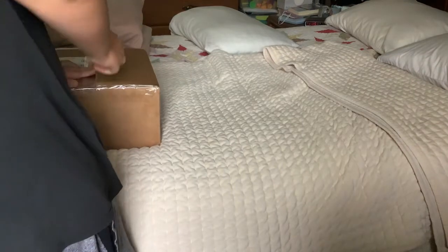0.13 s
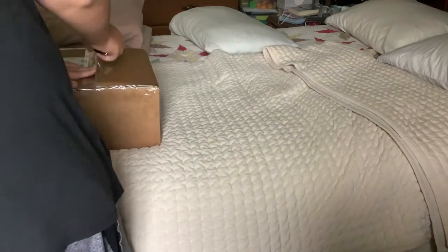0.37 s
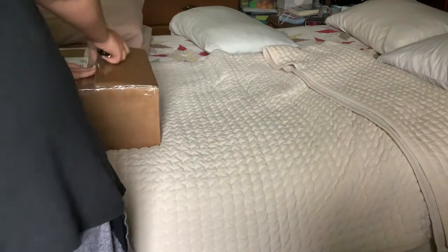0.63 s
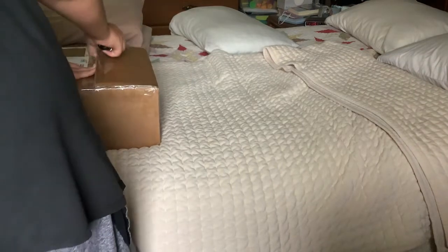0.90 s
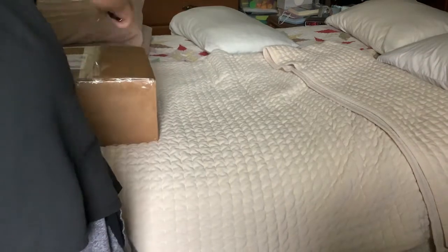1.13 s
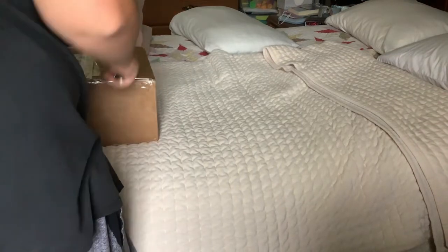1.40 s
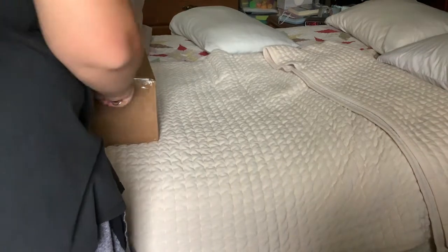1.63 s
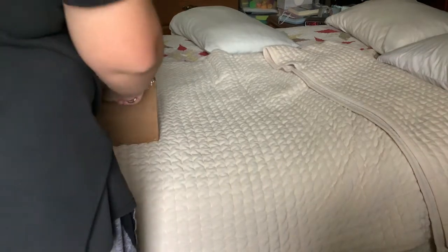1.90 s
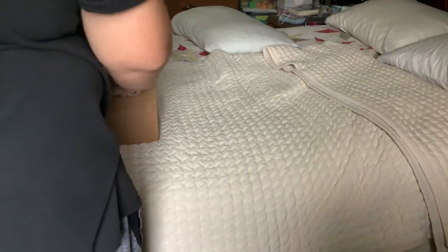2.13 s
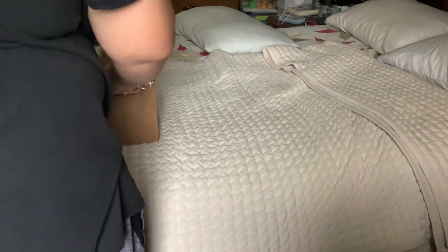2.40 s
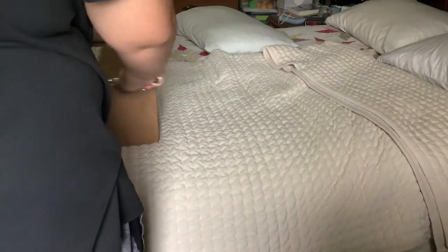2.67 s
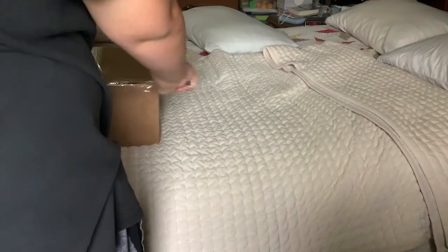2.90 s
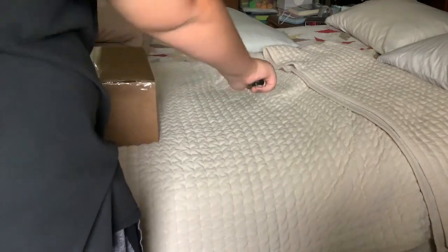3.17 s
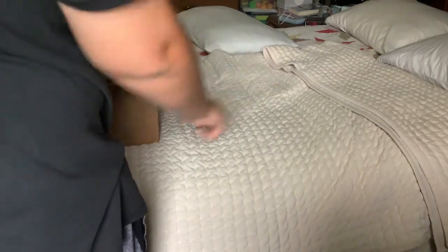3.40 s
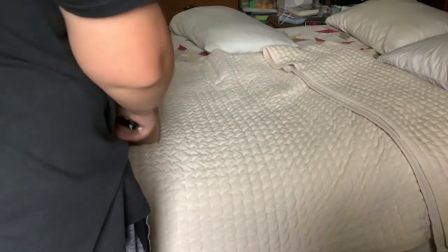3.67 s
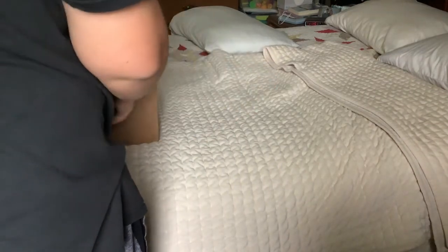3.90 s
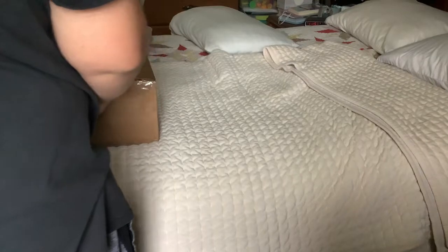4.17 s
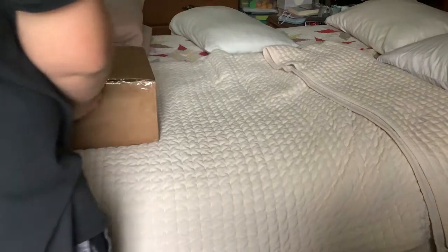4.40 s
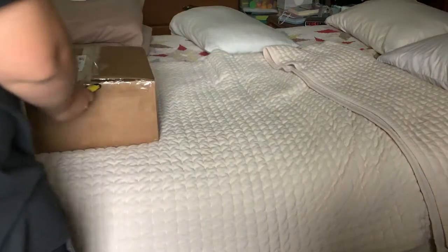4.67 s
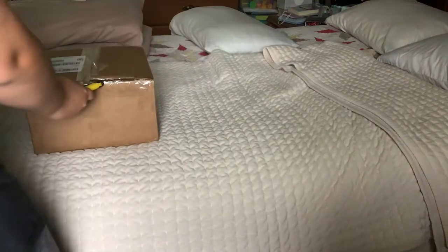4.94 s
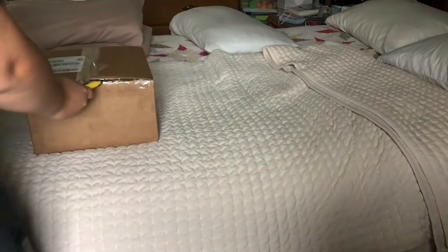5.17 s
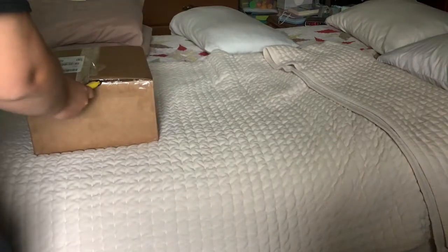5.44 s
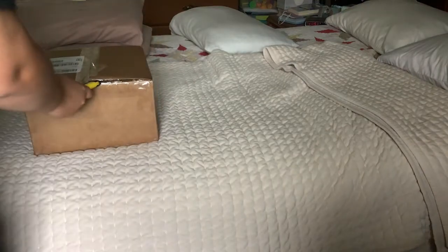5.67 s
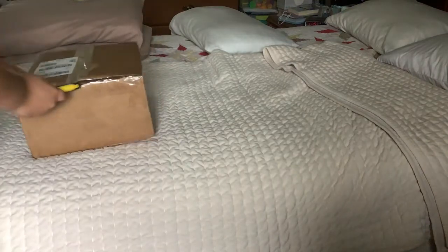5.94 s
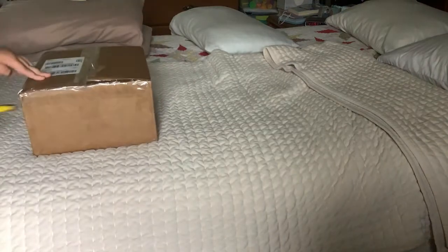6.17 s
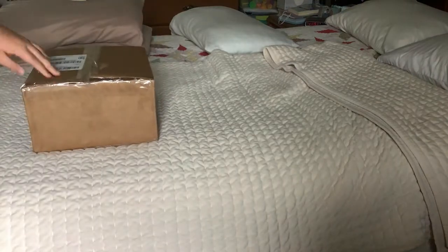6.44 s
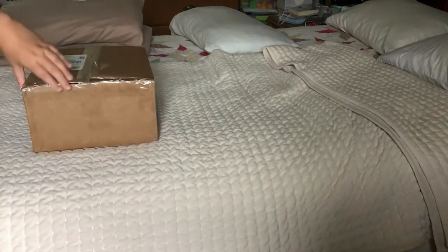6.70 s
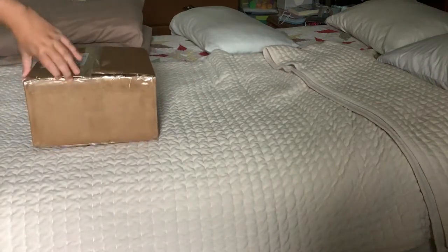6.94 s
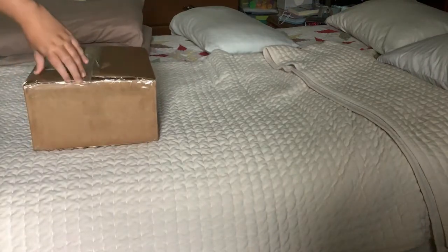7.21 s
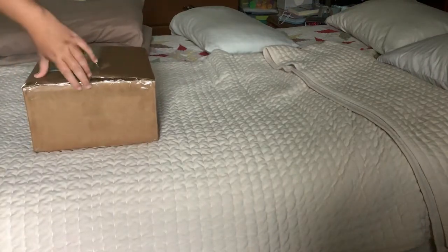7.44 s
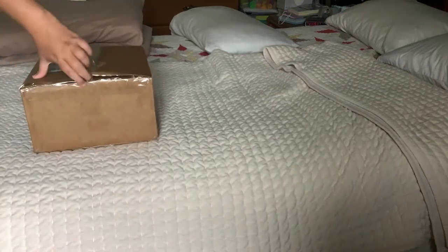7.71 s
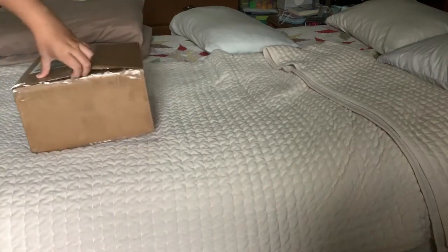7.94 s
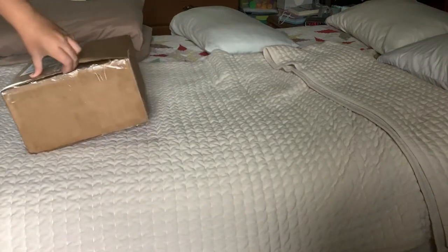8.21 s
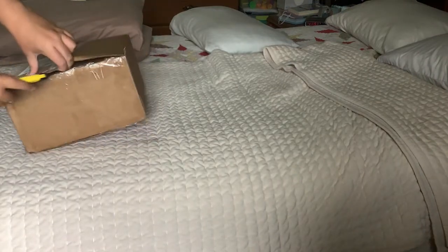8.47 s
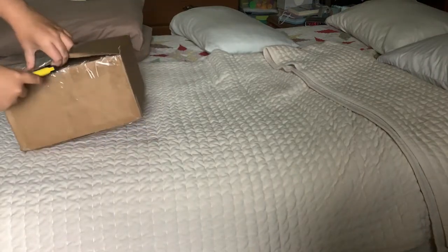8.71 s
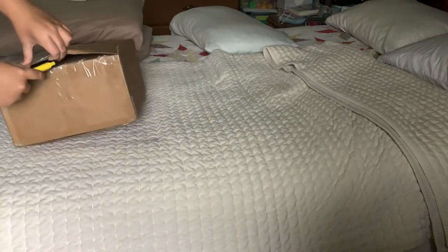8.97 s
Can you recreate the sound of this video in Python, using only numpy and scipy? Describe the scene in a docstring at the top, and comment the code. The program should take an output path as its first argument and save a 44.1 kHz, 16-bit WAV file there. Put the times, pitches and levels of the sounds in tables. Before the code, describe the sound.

Close, dry sound of a taped cardboard box being opened on a bed. Fingers rub faintly, a short tape snap comes near one second, then a dense crackling rip with hollow bumps. After sparse knocks and scrapes, the loudest sharp snap and a low squeak hit around six seconds, followed by lighter crackles and tugs. A soft low room rumble runs underneath.

```python
"""Packing tape lets go of a cardboard box in sharp snaps, hiss and dense crackle: clicks and noise in taut film.
Stretched tape and card squeak in gliding narrow bands; fingers rub the card, heard as noise through resonances.
The hollow box is knocked and shaken by hands: soft pushes and noise excite its damped modes.
It stands on a bed in a small soft room with a very short reverberation, over a low, nearly steady rumble."""
import sys
import numpy as np
from scipy import signal
from scipy.fft import rfft, irfft
from scipy.io import wavfile
from scipy.ndimage import uniform_filter1d

SR = 44100
rng = np.random.default_rng(int(sys.argv[2]) if len(sys.argv) > 2 else 0)


def persist_wave(psi):
    """Save psi, clipped to +-1, as 16-bit WAV."""
    counts = np.round(np.clip(psi, -1, 1) * 32767).astype(np.int16)
    wavfile.write(sys.argv[1], SR, np.atleast_2d(counts).T)


def gain_from_db(level_db):
    """Turn a decibel level (scalar or array-like) into a linear amplitude factor."""
    decades = np.asarray(level_db, float) / 20
    return 10 ** decades


N = 400869   # length in samples


def rms_one(x):
    """Normalisation: scale a signal to rms 1."""
    return x / np.sqrt(np.mean(x ** 2) + 1e-20)


def coloured(x, points):
    """Spectral shaping: filter by a (frequency_hz, density_db) table, then normalise to rms 1."""
    hz, db = np.transpose(points)
    bins = np.maximum(np.fft.rfftfreq(len(x), 1 / SR), 1)
    gain = gain_from_db(np.interp(np.log(bins), np.log(hz), db))
    return rms_one(irfft(rfft(x) * gain, len(x)))


def drift(rate_hz):
    """Slow random modulation: noise through a double low-pass pole, with a spread of about 1."""
    r = np.exp(-2 * np.pi * rate_hz / SR)
    noise = rng.standard_normal(N + SR)
    return rms_one(signal.lfilter([1], [1, -2 * r, r * r], noise)[SR:])


def resonance(x, hz, width_hz):
    """Simple resonator: a two-pole band with gain 1 on top."""
    r = np.exp(-np.pi * width_hz / SR)
    poles = [1, -2 * r * np.cos(2 * np.pi * hz / SR), r * r]
    return signal.lfilter([(1 - r * r) / 2, 0, (r * r - 1) / 2], poles, x)


FILM_RING_HZ, FILM_EDGE_HZ = 9200, 8400   # usual ring of the film; it holds little below the edge


def thin_film(clicks, hz=FILM_RING_HZ, width_hz=7000):
    """Impulse response of taut film: a few cycles at a very high pitch."""
    edge = signal.butter(5, FILM_EDGE_HZ, "high", fs=SR, output="sos")
    return signal.sosfilt(edge, resonance(clicks, hz, width_hz))


# single loud snaps of tape; ring_db is relative to the strength
# columns: start_s, strength_db, ring_hz, ring_db
TAPE_SNAPS = [(0.122, -46, 4450, -11.5), (0.1906, -61, 3540, 0.5), (0.6297, -35.5, 2130, -23),
              (0.792, -50, 9000, -21), (0.8335, -44, 8500, -24), (0.88, -36, 1690, -30),
              (0.955, -37, 6950, -28), (0.9694, -14, 7800, -27.5), (1.0549, -28.5, 2600, -35),
              (1.217, -46.5, 3800, -21.5), (1.3878, -35.5, 5830, -26), (2.218, -51.5, 1590, -18),
              (2.368, -30.5, 3900, -17.5), (2.521, -39.5, 8500, -33), (2.5358, -23.5, 3010, -26),
              (2.6145, -20, 3000, -39), (2.6581, -16, 2650, -35.5), (2.709, -24, 3600, -45),
              (2.72, -25, 3570, -45), (2.742, -19, 3600, -36), (2.7533, -20.5, 3570, -35),
              (2.821, -27.5, 3800, -28), (2.8439, -28, 3570, -40), (2.8526, -20, 3600, -33),
              (2.869, -20, 3600, -40), (2.8767, -15.5, 3370, -40), (2.8938, -9.5, 3500, -57),
              (2.925, -13.5, 3760, -29), (3.044, -35, 3560, -37), (3.237, -53, 3760, -15.5),
              (3.3826, -17.5, 2860, -35), (3.7405, -32.5, 2960, -28), (4.125, -57.5, 4400, -2.5),
              (4.3274, -43.5, 6600, -31), (4.8491, -34, 14200, -30), (5.1613, -20, 8060, -26.5),
              (5.4734, -41.5, 1680, -47), (5.7439, -27.5, 2110, -30), (5.8797, -30.5, 5140, -31),
              (5.9588, -35, 6750, -36), (5.967, -21, 6000, -38.5), (5.9784, -11, 3550, -28),
              (6.055, 1, 6070, -34.5), (6.084, -42, 6800, -17), (6.5314, -40.5, 1515, -10),
              (6.7182, -40, 3030, -34.5), (6.9306, -27, 2840, -29.5), (7.0843, -45, 7000, -24),
              (7.13, -35, 2770, -36), (7.1558, -35.5, 4120, -29), (7.1939, -25.5, 3000, -28),
              (7.224, -36, 9500, -39), (7.2353, -37, 2730, -38), (7.3474, -22.5, 6240, -31.5),
              (7.4182, -35.5, 9000, -33), (7.492, -33, 7100, -32), (7.528, -22, 13500, -26.5),
              (7.6887, -44, 9000, -25), (7.816, -23, 4300, -36.5), (7.923, -40, 8500, -34),
              (7.9448, -27, 1980, -44), (8.182, -40, 1560, -29), (8.3153, -29, 3090, -27),
              (8.338, -30, 3960, -31), (8.41, -23.5, 4200, -35.5), (8.57, -30.5, 4170, -31),
              (8.591, -22.5, 2830, -27.5), (8.601, -13.5, 2330, -38), (8.6868, -34, 6040, -36),
              (8.7037, -27.5, 6500, -43), (9.0099, -47.5, 1480, -9), (9.011, -50, 3780, -13)]
SNAP_S = .00035   # decay time of the splinter of noise in which the bond breaks
TICK_DB, TICK_HZ = -15, 3500   # part of a snap that goes straight into the card as a duller tick
RING_WIDTH = .2   # bandwidth of a ring as a share of its pitch
RUSTLE_DB = -29.5   # after-rustle, relative to the strength of the snap


def snaps():
    """Impulsive release: a click of the film, a short ring of card or, at the highest pitches, of taut film,
    and a grainy rustle as the tape springs back."""
    out, t = np.zeros(N + SR), np.arange(SR // 4) / SR
    noise = rng.standard_normal((len(TAPE_SNAPS), 3, len(t)))
    for (start, strength_db, hz, ring_db), (hiss, shake, lumps) in zip(TAPE_SNAPS, noise):
        splinter = lumps * np.exp(-t / SNAP_S) + 2 * (t == 0)
        tick = resonance(splinter, TICK_HZ, 5400)
        click = thin_film(splinter, width_hz=7100) + gain_from_db(TICK_DB) * tick
        click = 1.48 * click / np.linalg.norm(click)

        band = resonance(resonance(shake, hz, RING_WIDTH * hz), hz, 2 * RING_WIDTH * hz)
        # reversed, so that the band is already built up at the start
        ring = rms_one(band)[::-1] * np.exp(-t / 0.031)
        # the ring starts with a clean ping
        ring = ring + 1.1 * np.sin(2 * np.pi * hz * t) * np.exp(-t / 0.0064)

        # the rustle comes in millisecond lumps
        grain = gain_from_db(2.0 * rms_one(uniform_filter1d(lumps, size=60)))
        rustle = rms_one(resonance(hiss, 7600, 13000) * grain)
        rustle = rustle * np.exp(-t / 0.024) * (1 - np.exp(-t / 0.001))

        at = round(start * SR)
        out[at:at + len(t)] += gain_from_db(strength_db) * (click + gain_from_db(ring_db) * ring + gain_from_db(RUSTLE_DB) * rustle)
    return out[:N]


def grains(per_s, spread_db):
    """Random point process: clicks of very uneven size whose rate swells into clumps."""
    sizes = gain_from_db(spread_db * np.minimum(rng.exponential(1, N), 3.5)) * rng.choice([-1, 1], N)
    return sizes * (rng.random(N) < per_s * gain_from_db(5 * drift(25)) / SR)


# noise spectrum of peeling tape
# columns: frequency_hz, density_db (relative, per Hz)
FILM_SPECTRUM = [(2350, -49.5), (4000, -4), (6020, 1.5), (9230, 3), (14700, -2.5), (15800, 1.5),
                 (16500, -49)]
# small crackles ring higher or lower with the span of free film
# column: pitch_hz
CRACKLE_PITCHES = [8500, 10600, 13500]
CRACKLES_PER_S, CRACKLE_SPREAD_DB = 380, 4   # rate at full effort, before clumping; scale of uneven sizes
HARD_PEEL_DB = -49.5   # tape level of full effort
PATCHY_DB = 2.2   # parts of the film's hiss swell apart from each other


def peeling(level_db):
    """Stick-slip fracture: the adhesive front hisses in lumps and breaks into more crackle on a harder pull."""
    effort = np.clip(gain_from_db(level_db - HARD_PEEL_DB), 0, 1) ** 2
    clicks = grains(CRACKLES_PER_S * effort, CRACKLE_SPREAD_DB)
    dealt = rng.integers(0, len(CRACKLE_PITCHES), N)   # each click falls to one pitch
    crackle = rms_one(sum(thin_film(clicks * (dealt == k), hz, width_hz=1100)
                          for k, hz in enumerate(CRACKLE_PITCHES)))
    hiss = coloured(rng.standard_normal(N) * gain_from_db(2.5 * drift(120)), FILM_SPECTRUM)
    patches = sum(gain_from_db(PATCHY_DB * drift(9)) * resonance(hiss, hz, .4 * hz)
                  for hz in [4500, 8300, 13500])
    return gain_from_db(level_db) * (0.23 * crackle + rms_one(.5 * hiss + patches))


# thin squeaks and narrow scrapes of stretched tape and card; level_db holds before flicker and edge fades
# columns: start_s, end_s, start_hz, end_hz, width_hz, level_db
SQUEAK_GLIDES = [(1.283, 1.318, 3020, 3050, 50, -67.5), (1.31, 1.49, 2320, 2360, 50, -69),
                 (1.582, 1.658, 950, 1080, 97, -67), (1.635, 1.7, 4200, 3950, 188.6, -75),
                 (2.9, 2.948, 3600, 4000, 390, -52), (3.908, 3.999, 1390, 1920, 190, -72.5),
                 (3.996, 4.045, 1680, 1320, 150, -70), (1.5, 1.525, 2030, 2160, 65, -71),
                 (8.2, 8.31, 3700, 3700, 370.4, -75.5), (5.239, 5.32, 5130, 5170, 300, -69.5),
                 (5.76, 5.85, 7040, 7100, 64.81, -68), (5.874, 5.993, 650, 655, 30, -53.5),
                 (6.027, 6.132, 655, 596, 70, -48), (6.153, 6.496, 3000, 3900, 119, -72)]
SQUEAK_TONE = 0.9   # upper limit of the share of steady tone, approached in the narrowest squeaks
SQUEAK_FLICKER_DB = 1.8


def squeaks():
    """Narrow-band modulation: bands of noise glide, waver and flicker; the narrowest hold a tone."""
    out = np.zeros(N)
    noise = rng.standard_normal((len(SQUEAK_GLIDES), 4, SR // 2))
    for (start, end, start_hz, end_hz, width, db), draws in zip(SQUEAK_GLIDES, noise):
        a, b = round(start * SR), round(end * SR)
        waver, flicker = [rms_one(uniform_filter1d(d, size=900))[:b - a] for d in draws[:2]]
        r = np.exp(-2 * np.pi * width / SR)
        # complex low-pass noise, moved up to the gliding pitch below
        band = signal.lfilter([1], [1, -2 * r, r * r], draws[2] + 1j * draws[3])[a - b:]
        share = np.clip(SQUEAK_TONE * (1 - width / 250), 0, 1)
        pitch_hz = np.linspace(start_hz, end_hz, b - a) + 0.55 * width * waver
        carrier = np.exp(2j * np.pi * np.cumsum(pitch_hz) / SR)
        envelope = share + np.sqrt(1 - share ** 2) * band / np.std(band)
        sound = rms_one((envelope * carrier).real)
        out[a:b] += gain_from_db(db + SQUEAK_FLICKER_DB * flicker) * sound * np.hanning(b - a) ** 0.24
    return out


# broad resonances of the rubbed card; level_db also drifts
# columns: pitch_hz, width_hz, level_db (relative)
CARD_BANDS = [(1050, 1060, 24), (1970, 590, -12), (2450, 530, 12.5), (3000, 3940, 22), (4200, 3600, -15),
              (5650, 960, 0)]
# narrow patches of the card that come and go under the skin
FIBRES_DB, FIBRES_FLICKER_DB, FIBRES_WIDTH_HZ = -8, 7.5, 320


def rubbing(level_db):
    """Friction noise: skin drags over card, whose broad and flickering narrow resonances colour the hiss."""
    drag = rng.standard_normal(N) * gain_from_db(2.0 * drift(90))   # the skin catches in short lumps
    broad, fibres = 0, 0
    for k, (hz, width, db) in enumerate(CARD_BANDS):
        broad = broad + gain_from_db(db + 1.5 * drift(6)) * resonance(drag, hz, width) * (-1) ** k
    for hz in np.geomspace(1400, 6000, 9):
        flicker = gain_from_db(FIBRES_FLICKER_DB * np.clip(drift(6.5), -3, 1.6))
        fibres = fibres + flicker * resonance(drag, hz, FIBRES_WIDTH_HZ)
    return gain_from_db(level_db) * rms_one(rms_one(broad) + gain_from_db(FIBRES_DB) * rms_one(fibres))


def in_time(rows):
    """Linear interpolation in dB: the columns of a table at every sample; silence outside it."""
    s, *columns = np.transpose(rows)
    t = np.arange(N) / SR
    return np.array([np.interp(t, s, c, left=-200, right=-200) for c in columns])


FADE_DB = 20   # what a level loses over its rise or fall time


def loudest(level_db, events):
    """Exponential envelopes: events rise and fade evenly in dB; the loudest at any moment counts."""
    out = level_db.copy()
    for peak, rise, fall, *db in events:
        a, b = max(int((peak - 3 * rise) * SR), 0), min(int((peak + 3 * fall) * SR), N)
        t = np.arange(a, b) / SR - peak
        loss_db = FADE_DB * np.maximum(-t / rise, t / fall)
        out[:, a:b] = np.maximum(out[:, a:b], np.c_[db] - loss_db)
    return out


# long pulls, one table each
# columns: time_s, tape_db, skin_db
LONG_PULLS = [
    [(2.49, -114, -90), (2.54, -40.5, -48.5), (2.58, -40.5, -45.5), (2.62, -52.5, -60), (2.7, -45.5, -52),
     (2.81, -55, -56.5), (2.88, -55, -59), (2.94, -40, -43.5), (3.01, -64, -57.5), (3.06, -61, -72),
     (3.13, -108, -83)],
    [(5.84, -72, -71.5), (5.98, -39, -46), (6.04, -49, -41), (6.07, -56, -46), (6.14, -58, -53),
     (6.2, -83, -57), (6.335, -75, -59), (6.36, -55, -58), (6.39, -58.5, -58.5), (6.445, -75.5, -58.5),
     (6.53, -91, -64.5)],
    [(7.46, -89, -76), (7.5, -53, -68), (7.54, -60, -57), (7.65, -80, -73), (7.72, -61.5, -59),
     (7.83, -54.5, -62), (7.9, -67.5, -61), (7.96, -62, -69), (8.01, -59.5, -60.5), (8.16, -96, -83)],
]
# strokes of the fingers that swell and fade
# columns: peak_s, rise_s, fall_s, tape_db, skin_db
FINGER_STROKES = [(0.0, .05, 0.064, -63.5, -58.5), (0.22, 0.18, 0.13, -71, -65.5),
                  (0.55, 0.044, 0.07, -68, -70), (0.81, 0.53, 1, -74.5, -68.5),
                  (0.978, 0.049, 0.12, -45, -45), (1.28, 0.2, 0.69, -72, -69.5),
                  (1.4, 0.24, 0.22, -69.5, -63), (1.665, 0.14, 0.14, -70.5, -61.5),
                  (1.81, 0.32, 0.12, -88, -71), (2.26, 0.17, 0.041, -72.5, -73),
                  (3.25, 0.022, 0.11, -76, -68), (3.36, 0.027, 0.13, -60.5, -73),
                  (3.72, 0.068, 0.096, -67.5, -68), (3.96, 0.13, 0.085, -61, -72),
                  (4.03, 0.26, 0.22, -76, -66.5), (4.18, 0.046, 0.047, -68.5, -63.5),
                  (4.899, 0.12, 0.084, -88.5, -60.5), (5.09, 0.15, 0.078, -92, -62),
                  (5.3, 0.1, 0.13, -73, -70), (5.5, 0.21, 0.31, -75, -68), (6.729, 0.32, 0.38, -73.5, -75),
                  (6.941, 0.068, 0.077, -56.5, -59.5), (7.21, 0.43, 0.65, -71.5, -75.5),
                  (8.601, 0.015, 0.075, -42.5, -42.5), (8.74, 0.42, 0.04, -62, -73)]
# sudden tugs with a quick attack, then dying; the peak comes TUG_ATTACK_S after the start
# columns: start_s, fall_s, tape_db, skin_db
SUDDEN_TUGS = [(0.116, 0.091, -72, -63), (0.631, 0.11, -53, -54.5), (2.362, 0.074, -53, -54.5),
               (3.379, 0.062, -46, -43), (3.731, 0.062, -47.5, -52.5), (4.842, 0.06, -66, -64),
               (5.153, 0.09, -51, -57), (5.739, 0.091, -50.5, -48), (6.519, 0.1, -58.5, -53.5),
               (7.338, 0.12, -57.5, -60), (8.172, 0.14, -66, -62), (8.308, 0.078, -52, -66.5),
               (8.404, 0.15, -58, -55.5), (8.564, 0.13, -55, -59), (9.003, 0.057, -78, -61)]
TUG_ATTACK_S = 0.014
REST_TAPE_DB, REST_SKIN_DB = -83.5, -84.5   # hands lying on the box


def hands():
    """Envelope control: levels of tape and skin from rest, pulls, strokes and tugs."""
    pulled = np.max([in_time(pull) for pull in LONG_PULLS], axis=0)
    held = np.maximum(pulled, [[REST_TAPE_DB], [REST_SKIN_DB]])
    tugs = [(start + TUG_ATTACK_S, TUG_ATTACK_S, *rest) for start, *rest in SUDDEN_TUGS]
    return loudest(held, FINGER_STROKES + tugs)


# wall and cavity modes of the box; level_db is relative, before the favoured pitch weighs it
# columns: pitch_hz, level_db, t60_s
BOX_MODES = [(100.5, 2, 0.062), (118, 6, 0.056), (176.5, -10, 0.22), (210, -13, 0.2), (276, -1, 0.048),
             (343, -2, 0.051), (376.4, -6.5, 0.089), (424.7, -11, 0.16), (497, -9.5, 0.11),
             (583, -3.5, 0.03), (655, -3, 0.047), (800, 1.5, 0.0097)]


def box(force, near_hz=300, reach=6.1):
    """Modal synthesis: damped modes ring, most within a reach (octaves) of the favoured pitch."""
    out = 0
    for k, (hz, db, t60) in enumerate(BOX_MODES):
        r, w = gain_from_db(-60 / (t60 * SR)), 2 * np.pi * hz / SR
        gain = gain_from_db(db - 2.3 * (np.log2(hz / near_hz) / reach) ** 2)
        signed_gain = gain * np.sin(w) * (-1) ** k
        out = out + signal.lfilter([0, signed_gain], [1, -2 * r * np.cos(w), r * r], force + 1e-18)
    return out


# knocks on the box; the peak lies 3.5 dB below level_db, and the blow favours modes near pitch_hz
# columns: start_s, level_db, pitch_hz
BOX_KNOCKS = [(0.967, -32, 244), (0.978, -35, 680), (1.29, -51, 580), (1.595, -44.5, 230),
              (1.678, -39, 433), (2.554, -30.5, 332), (2.903, -31, 196), (2.948, -28.5, 118),
              (3.381, -33, 600), (3.389, -19.5, 325), (3.402, -24.5, 333), (3.421, -40, 296),
              (3.438, -34.5, 280), (3.74, -44.5, 357), (4.742, -51, 690), (4.741, -41.5, 430),
              (5.966, -35.5, 646), (5.995, -32, 125), (6.049, -27.5, 335), (7.528, -42, 328),
              (7.545, -47.5, 567), (7.745, -43, 418), (7.816, -39.5, 320), (8.606, -44, 636)]
PUSH_S = 0.0052   # time at which a knock's push is strongest
CONTACT, CONTACT_S = 4.4, .0003   # height and decay time of its first contact


def knocks():
    """Impact excitation: a soft uneven push of a few milliseconds sets the box ringing."""
    out, t = np.zeros(N + SR), np.arange(SR // 2) / SR
    noise = rng.standard_normal((len(BOX_KNOCKS), len(t)))
    for (start, db, hz), shove in zip(BOX_KNOCKS, noise):
        push = rms_one(uniform_filter1d(shove, size=24)) * t / PUSH_S * np.exp(-t / PUSH_S)
        push = push + CONTACT * np.exp(-t / CONTACT_S)
        boom = box(push, hz, reach=0.36)
        at = round(start * SR)
        out[at:at + len(t)] += gain_from_db(db - 3.5) * boom / np.abs(boom).max()
    return out[:N]


# weight of the hands on the box
# columns: time_s, level_db
HAND_WEIGHT = [(0.0, -80), (0.9, -62), (2.5, -80), (3.45, -56.5), (4.25, -71), (6.15, -55.5), (7.1, -65.5),
               (8.65, -60.5), (9.09, -83)]
# shoves against the walls
# columns: peak_s, rise_s, fall_s, level_db
WALL_SHOVES = [(0.0, .1, 0.14, -53), (0.988, 0.13, 0.12, -42.5), (1.72, 0.51, 0.42, -54),
               (2.558, 0.066, 0.46, -41), (2.93, 0.15, 0.091, -37), (3.41, 0.021, 0.086, -41),
               (6.049, 0.17, 0.11, -34.5), (7.571, 0.89, 1, -54), (8.611, 0.048, 0.038, -44)]


def walls():
    """Forced vibration: pulling and pressing shakes the box walls, as uneven noise through the modes."""
    level_db, = loudest(in_time(HAND_WEIGHT), WALL_SHOVES)
    shaking = rng.standard_normal(N) * gain_from_db(2.2 * drift(21))
    return gain_from_db(level_db - 4) * rms_one(box(shaking))


ROOM_T60_S, ROOM_DB = 0.012, -9.5   # decay by 60 dB; gain of the echo pattern


def room(x):
    """Convolution reverberation: a dense echo pattern of dying noise that starts after 2 ms."""
    t = np.arange(SR // 2) / SR
    echoes = rng.standard_normal(len(t)) * gain_from_db(-60 * t / ROOM_T60_S) * (t > .002)
    return gain_from_db(ROOM_DB) * signal.fftconvolve(x, echoes / np.linalg.norm(echoes))[:N]


# spectrum of room and microphone noise
# columns: frequency_hz, density_db (relative, per Hz)
RUMBLE_SPECTRUM = [(15, -44.5), (25, -27.5), (90, -2), (124, 3.5), (187, -11.5), (280, -7.5), (389, -14),
                   (445, -19), (510, -18.5), (1180, -38.5), (4860, -46.5), (9330, -46), (13600, -45),
                   (15200, -47), (16500, -62.5)]


def rumble():
    """Stationary coloured noise: a low rumble whose level wanders slightly about -57.5 dB."""
    level_db = -57.5 + 1.2 * drift(9.8)
    return gain_from_db(level_db) * coloured(rng.standard_normal(N), RUMBLE_SPECTRUM)


def scene():
    """Superposition: tape, hands and box with their reverberation, over the rumble."""
    tape_db, skin_db = hands()
    near = snaps() + peeling(tape_db) + squeaks() + rubbing(skin_db) + knocks() + walls()
    return (near + room(near) + rumble())[None]


def roll_off(x):
    """The treble ends steeply here."""
    return signal.sosfilt(signal.butter(12, 16850, fs=SR, output="sos"), x)


def record(dry):
    """High-pass filtering: a low cut at 60 Hz removes the deep bass."""
    mix = signal.sosfilt(signal.butter(3, 60, "high", fs=SR, output="sos"), dry)
    return roll_off(mix)


dry = scene()
out = record(dry)
persist_wave(out)
```